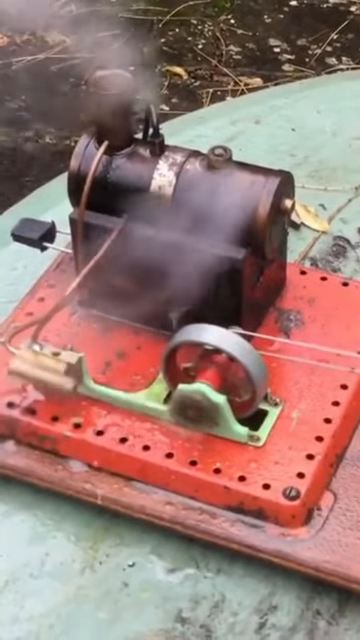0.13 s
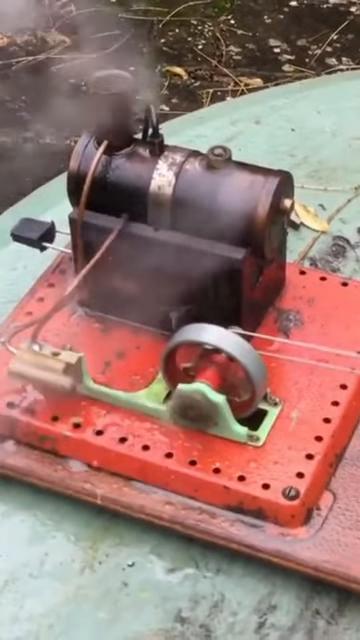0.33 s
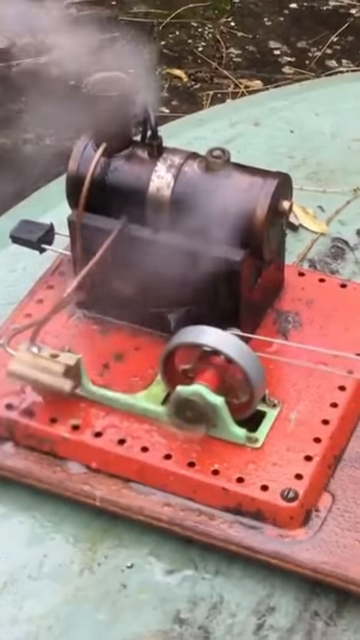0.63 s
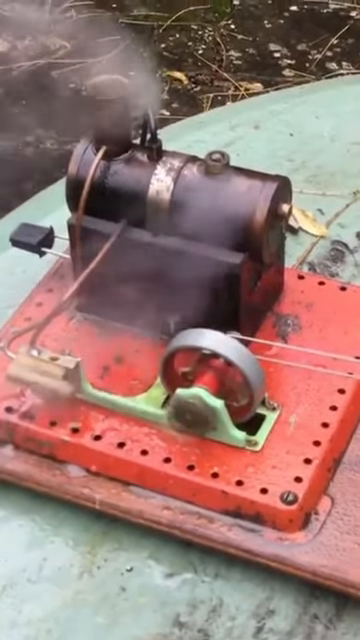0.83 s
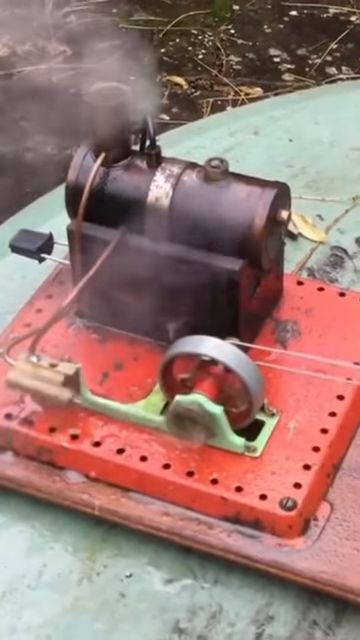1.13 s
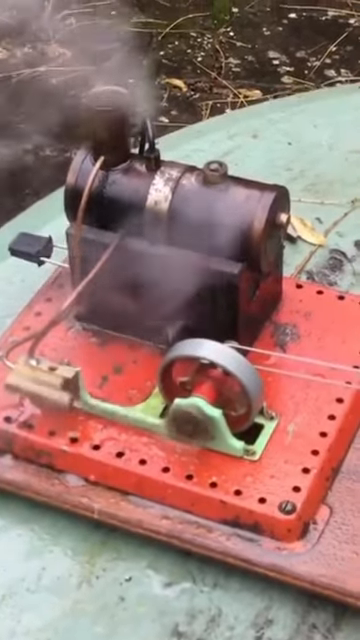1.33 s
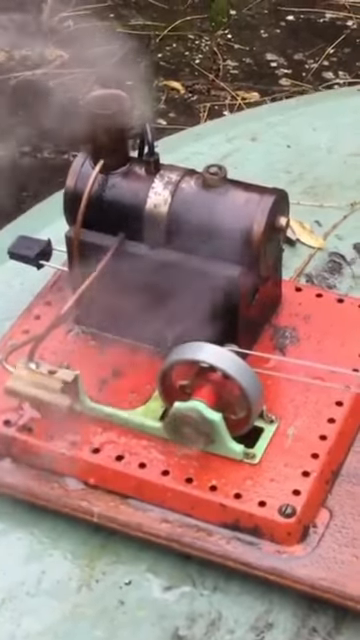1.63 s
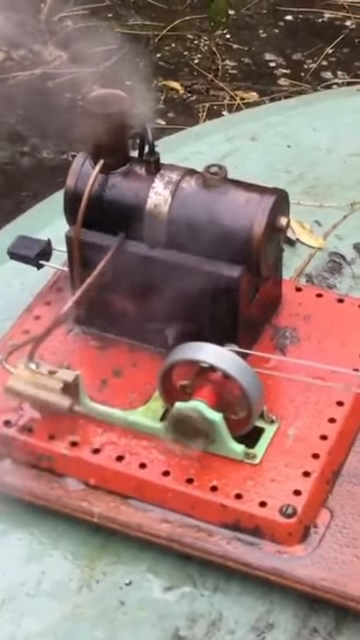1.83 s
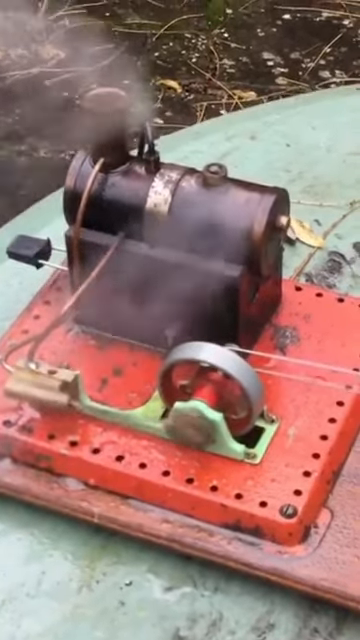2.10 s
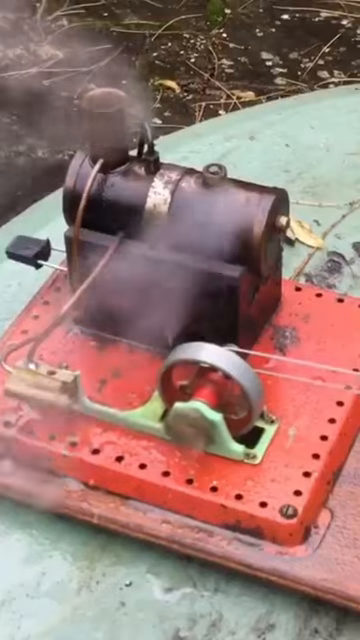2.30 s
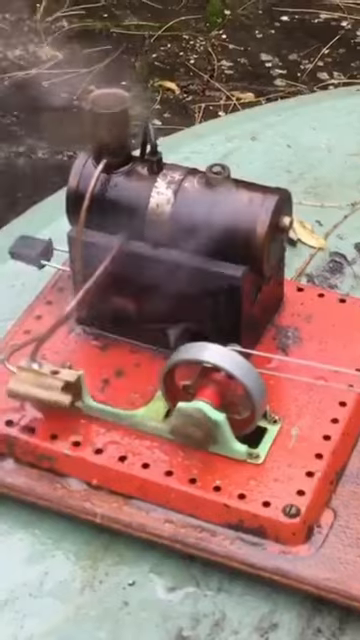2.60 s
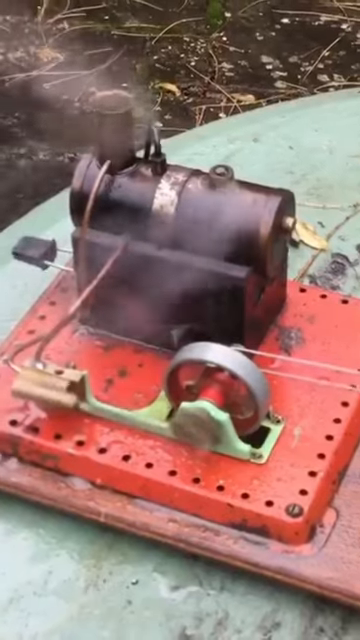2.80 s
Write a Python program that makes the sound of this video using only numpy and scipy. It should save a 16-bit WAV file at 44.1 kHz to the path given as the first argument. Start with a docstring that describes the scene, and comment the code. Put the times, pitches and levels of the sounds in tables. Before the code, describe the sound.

A small model steam engine runs fast, rattling with rapid metallic clatter over faint steam hiss

```python
"""A toy steam engine runs fast on a tin base plate on a garden table, close to the microphone.
Throughout, the garden hums faintly (coloured noise) and the unbalanced wheel shakes the table (low sines).
Each turn opens with a hard click that rings the crank; slack crank and rocking cylinder then knock in three
groups. Light parts click and chatter as table, plate, boiler, frame and bearing thud.
Early in the turn the steam hiss (coloured noise) swells; loose light parts rattle at random all the while."""
import sys
import numpy as np
from scipy import signal
from scipy.fft import rfft, irfft
from scipy.io import wavfile
from scipy.ndimage import uniform_filter1d

SR = 44100
rng = np.random.default_rng(int(sys.argv[2]) if len(sys.argv) > 2 else 0)


def pcm_store(signal):
    """Save signal as 16-bit PCM."""
    levels = np.round(np.clip(np.atleast_2d(signal), -1, 1) * 32767)
    wavfile.write(sys.argv[1], SR, levels.astype(np.int16).T)


N = 130095

TURN_S = 0.041406
# Lateness of turns against a steady beat. Each row: time in seconds, lateness in ms.
LATENESS = [(0.0, 13.29), (0.083, 13.92), (0.248, 14.67), (0.29, 14.65), (0.414, 15.01), (0.497, 15.06),
            (0.58, 14.99), (0.745, 14.37), (0.952, 14.08), (1.035, 13.72), (1.159, 13.4), (1.284, 13.42),
            (1.449, 13.19), (1.532, 12.9), (1.739, 13.01), (1.905, 12.76), (1.987, 12.78), (2.195, 13.12),
            (2.36, 13.03), (2.691, 14.39), (2.774, 14.89), (2.857, 15.59), (2.95, 15.89)]

# Garden hum spectrum. Each row: frequency in Hz, relative level in dB.
GARDEN_SPECTRUM = [(12, -55), (25, -28), (45, -7), (86, -6), (203, -1), (248, -6.5), (325, -7), (500, -24),
                   (650, -65), (1100, -120)]
GARDEN_RMS_DB = -47

# Steam hiss spectrum. Each row: frequency in Hz, relative level in dB.
STEAM_SPECTRUM = [(240, -22.5), (400, -8.5), (501, -15), (627, -7), (1090, -10.5), (1280, -8), (1480, -9.5),
                  (2060, -7), (2600, -12), (3350, -15), (4200, -12.5), (5190, -16), (6160, -34),
                  (7310, -22.5), (8570, -21.5), (9400, -36), (12200, -81.5), (20700, -120)]
STEAM_RMS_DB = -48.5  # before puffs and flicker
PUFF_SWING_DB, PUFF_PEAK_TURNS = 2.88, 0.08
FLICKER_DB_PER_DRIFT, FLICKER_RATE_HZ = 0.66, 11.44

# Shake harmonics of the wheel. Each row: multiple of the turn rate, relative level in dB.
SHAKE_HARMONICS = [(2, -16.5), (3, -14.5), (4, 1.5), (5, -23), (6, -12), (7, -2)]
# Overall shake level. Each row: time in seconds, level in dB.
SHAKE_LEVEL = [(0.0, -54), (0.42, -49), (0.53, -56), (0.64, -45.5), (0.849, -55.5), (0.93, -49),
               (1.22, -58), (1.281, -53.5), (2.0, -52.5), (2.09, -57), (2.19, -52), (2.71, -59.5),
               (2.78, -46), (2.95, -69)]
WAVER_DB_PER_DRIFT, WAVER_RATE_HZ = 4, 7

# Blow strength over time. Each row: time in seconds, table and plate in dB,
# boiler, frame and bearing in dB, rod in dB, lighter parts in dB.
FORCE = [(0, 1.2, 0.075, -1.7, -0.31), (.35, 1.9, 0.012, 0.84, -0.41), (.7, 0.86, 0.57, -0.36, 0.53),
         (1.05, 0.99, 0, 1.1, -0.24), (1.4, 1.1, -1.3, 0.62, -1.6), (1.75, 1.6, 0.49, 0.79, -1.7),
         (2.101, 1.2, -1.3, 2.5, -0.59), (2.501, 1.15, -0.036, 1.1, -1.4), (2.95, 1.8, 0.17, 0.15, 0)]

# Clicks of one turn on the light parts. Each row: time after turn start in ms (before the advance),
# rod in dB, cylinder in dB, pin in dB, small parts in dB.
CLICKS = [(-0.67, -16.5, -10.5, -10, -9.5), (0.26, -2, -4, 0.5, 0.5), (1.5, -8.5, -13.5, -4.5, -6),
          (2.5, -11, -12.5, -16.5, -13), (6.5, -24.5, -32, -24, -23), (10, -20, -20.5, -20, -21),
          (12.5, -10, -24.5, -1.5, -8), (14.5, -3, -15.5, -6, 1.5), (17, -6.5, -15.5, -6, 3.5),
          (19, -10, -9.5, -4.5, -15.5), (22.5, -20.5, -16, -16, -9.5), (26.5, -24.5, -2, -20, -16.5),
          (28.5, -21.5, -7.5, -10, -2), (30.5, -13.5, -1, -4.5, -2.5), (32, -29.5, -10, -6.5, -9.5)]
# Time advance that makes up for the top filter's delay and the chatter's rise.
# One row: rod, cylinder, pin, small parts, all in ms.
CLICK_ADVANCE_MS = (0.29, 0.28, 0.883, 1.6)
# Turn-to-turn spread. One row: rod, cylinder, pin, small parts, all in dB (std).
TURN_SCATTER_DB = (0.54, 2.2, 1.08, 2.2)
CLICK_JITTER_MS, CLICK_SCATTER_DB = 0.1, 0.95
CLICK_DB = -1
CHATTER_MS, CHATTER_RE_CLICK_DB = 2.0, -2.5
CHATTER_CARRYOVER = 0.6  # share kept from the turn before
RATTLE_PER_S, RATTLE_DB = 750, -27.5
CRANK_SCATTER_DB, CRANK_ADVANCE_MS = 3, 0.8

# Modes of the light parts. Each row: frequency in Hz, level in dB, t60 in seconds.
ROD_MODES = [(1520, -56, 0.0032), (1737, -49, 0.0084), (1904, -41, 0.0093), (2078.5, -34, 0.0085),
             (2205, -44, 0.0068), (2303, -37.5, 0.008), (2422, -47, 0.005)]
CYLINDER_MODES = [(2947, -42.5, 0.0067), (3615, -45, 0.005)]
PIN_MODES = [(4138, -44.5, 0.0027), (4296, -43, 0.0036), (4940, -43, 0.0057), (5270, -59.5, 0.0088)]
SMALL_MODES = [(7246, -58, 0.0059), (7490, -54, 0.00723), (8307, -50.5, 0.0047), (8510, -62, 0.017)]
CRANK_MODES = [(5058, -46.5, 0.011), (8400, -53.5, 0.011)]

# Thuds of one turn on the heavy parts. Each row: time after turn start in ms,
# table in dB, plate in dB, boiler in dB, frame in dB, bearing in dB.
THUDS = [(0.3, -6.9, -40.0, -10.3, -16.7, -2.3), (2.26, -17.5, -10.9, -7.9, -40.0, -25.0),
         (3.21, -40.0, -5.4, 0.0, -0.1, -4.4), (9.66, -13.5, 0.0, -18.0, -40.0, -4.9),
         (13.15, -40.0, -1.3, -14.9, -3.6, 0.0), (15.77, -8.4, -10.7, -24.3, 0.0, -20.7),
         (17.18, -8.3, -9.0, -40.0, -1.7, -4.4), (19.0, -40.0, -1.0, -12.5, -3.0, -40.0),
         (31.6, 0.0, -40.0, -23.7, -40.0, -19.2)]
THUD_JITTER_MS, THUD_SCATTER_DB, PUSH_MS = 0.034, 1, 0.4
RADIATES_FROM_HZ = 165  # heavy parts move too little air below this

# Modes of the heavy parts. Each row: frequency in Hz, level in dB, t60 in seconds.
TABLE_MODES = [(214, -37.5, 0.097)]
PLATE_MODES = [(337, -32.1, 0.079), (297, -47.7, 0.058), (363, -48.6, 0.051), (422, -57.4, 0.041)]
BOILER_MODES = [(637.5, -38, 0.036), (553, -37, 0.05)]
FRAME_MODES = [(735, -53, 0.0075), (951, -46.5, 0.028)]
BEARING_MODES = [(1298, -40.5, 0.033), (1217, -42.5, 0.014)]

MIC_LOW_CUT_HZ, MIC_TOP_HZ = 54, 9050


def undb(db):
    """dB to amplitude gain."""
    return 10 ** (np.asarray(db) / 20)


def drift(rate_hz):
    """Smooth random drift, rms about 0.73: random steps at rate_hz, averaged twice over a step."""
    step = int(SR / rate_hz)
    held = np.repeat(rng.standard_normal(N // step + 1), step)
    smooth = uniform_filter1d(uniform_filter1d(held, step), step)
    return 0.98 * smooth[:N]


def coloured_noise(spectrum, rms_db):
    """Gaussian noise shaped by a spectrum, interpolated over log frequency, at a set rms."""
    hz = np.maximum(np.fft.rfftfreq(N, 1 / SR), 1)
    points = np.array(spectrum)
    gain = undb(np.interp(np.log(hz), np.log(points[:, 0]), points[:, 1]))
    noise = irfft(rfft(rng.standard_normal(N)) * gain, N)
    return noise * undb(rms_db) / np.std(noise)


def ring(strikes, modes, swell):
    """Decaying modes; light parts are reached through the linkage, so their ring swells first."""
    out = 0
    for hz, db, t60_s in modes:
        pole = np.exp(2j * np.pi * hz / SR - np.log(1000) / (t60_s * SR))
        mode = signal.lfilter([1], [1, -pole], strikes)
        if swell:  # second pass, scaled to keep the peak level
            mode = signal.lfilter([np.e * (1 - abs(pole))], [1, -pole], mode)
        out = out + undb(db) * mode.imag
    return out


def place(at_s, shapes):
    """Sum one short shape at each time; the result starts 0.5 s early so rings can build."""
    index = np.round(at_s * SR).astype(int)[:, None] + np.arange(shapes.shape[1]) + SR
    return np.bincount(index.ravel(), shapes.ravel(), N + 2 * SR)[SR // 2:N + SR]


def hump(length_ms):
    """One smooth contact: sine-squared pulse."""
    ms = np.arange(192) / SR * 1000
    return np.sin(np.pi * np.clip(ms / length_ms, 0, 1)) ** 2


def force_db(at_s, column):
    """Blow strength at the given times."""
    rows = np.array(FORCE)
    return np.interp(at_s, rows[:, 0], rows[:, column])


def garden():
    """Faint hum: steady coloured noise."""
    return coloured_noise(GARDEN_SPECTRUM, GARDEN_RMS_DB)


def steam(turns):
    """Hiss from boiler and cylinder ports, swelling once a turn and flickering."""
    puff_db = PUFF_SWING_DB * np.cos(2 * np.pi * (turns - PUFF_PEAK_TURNS))
    flicker_db = FLICKER_DB_PER_DRIFT * drift(FLICKER_RATE_HZ)
    return coloured_noise(STEAM_SPECTRUM, STEAM_RMS_DB) * undb(puff_db + flicker_db)


def shake(turns):
    """Unbalanced wheel shakes the table: wavering sines on multiples of the turn rate."""
    out = 0
    for multiple, db in SHAKE_HARMONICS:
        gain = undb(db + WAVER_DB_PER_DRIFT * drift(WAVER_RATE_HZ))
        out = out + gain * np.sqrt(2) * np.sin(2 * np.pi * multiple * turns)
    times_s, level_db = np.array(SHAKE_LEVEL).T
    return undb(np.interp(np.arange(N) / SR, times_s, level_db)) * out


def crank(starts_s):
    """The hard first click of each turn rings the crank."""
    gain = undb(CRANK_SCATTER_DB * rng.standard_normal((len(starts_s), 1)))
    return ring(place(starts_s - CRANK_ADVANCE_MS / 1000, gain), CRANK_MODES, True)[SR // 2:]


def click_shapes(turn_count, click_count):
    """Impulse plus a short noise burst of chatter, partly alike from turn to turn."""
    window = hump(CHATTER_MS)
    chatter = rng.standard_normal((turn_count, click_count, len(window)))
    chatter = signal.lfilter([1], [1, -CHATTER_CARRYOVER], chatter, axis=0)
    chatter = chatter.reshape(turn_count * click_count, -1) * window
    chatter = chatter / np.linalg.norm(chatter, axis=1, keepdims=True)
    impulse = signal.unit_impulse(len(window))
    return undb(CLICK_DB) * (undb(CHATTER_RE_CLICK_DB) * chatter + impulse)


def loose_rattle():
    """Random impulses of exponentially distributed height from looseness in the light parts."""
    hit, height = rng.random(size=(N + SR // 2, 2)).T
    return undb(RATTLE_DB) * (hit < RATTLE_PER_S / SR) * np.log(1 - height)


def clicks(starts_s):
    """Clicks with chatter, and loose rattle, ring the light parts; some turns hit harder."""
    rows = np.array(CLICKS)
    chance = rng.standard_normal((len(starts_s), len(rows), 5))
    turn_db = np.array(TURN_SCATTER_DB) * rng.standard_normal((len(starts_s), 1, 4))
    at_s = (starts_s[:, None] + (rows[:, 0] + CLICK_JITTER_MS * chance[..., 0]) / 1000).ravel()
    level_db = rows[:, 1:] + CLICK_SCATTER_DB * chance[..., 1:] + turn_db
    shapes = click_shapes(len(starts_s), len(rows))
    rattle = loose_rattle()
    out = 0
    for part, modes in enumerate((ROD_MODES, CYLINDER_MODES, PIN_MODES, SMALL_MODES)):
        gain = undb(level_db[..., part].ravel() + force_db(at_s, column=3 if part == 0 else 4))
        strikes = place(at_s - CLICK_ADVANCE_MS[part] / 1000, gain[:, None] * shapes)
        out = out + ring(strikes + rattle, modes, True)[SR // 2:]
    return out


def thuds(starts_s):
    """Soft pushes, nearly alike on every turn, ring the heavy parts."""
    rows = np.array(THUDS)
    chance = rng.standard_normal((len(starts_s), len(rows), 6))
    at_s = (starts_s[:, None] + (rows[:, 0] + THUD_JITTER_MS * chance[..., 0]) / 1000).ravel()
    level_db = rows[:, 1:] + THUD_SCATTER_DB * chance[..., 1:]
    push = hump(PUSH_MS) / hump(PUSH_MS).sum()
    out = 0
    for part, modes in enumerate((TABLE_MODES, PLATE_MODES, BOILER_MODES, FRAME_MODES, BEARING_MODES)):
        gain = undb(level_db[..., part].ravel() + force_db(at_s, column=1 if part < 2 else 2))
        out = out + ring(place(at_s, gain[:, None] * push), modes, False)
    radiation = signal.butter(2, RADIATES_FROM_HZ, "high", fs=SR, output="sos")
    return signal.sosfiltfilt(radiation, out)[SR // 2:]


def scene():
    """Garden, steam and engine on one uneven turn clock."""
    count = np.arange(-4, int(N / SR / TURN_S) + 2)
    times_s, late_ms = np.array(LATENESS).T
    beat_s = count * TURN_S
    starts_s = beat_s + np.interp(beat_s, times_s, late_ms) / 1000
    turns = np.interp(np.arange(N) / SR, starts_s, count)
    background = garden() + steam(turns) + shake(turns)
    engine = crank(starts_s) + clicks(starts_s) + thuds(starts_s)
    return (background + engine)[None]


def record(dry):
    """The microphone drops the deep bass and cuts the top."""
    low_cut = signal.butter(2, MIC_LOW_CUT_HZ, "high", fs=SR, output="sos")
    top_cut = signal.ellip(10, 0.2, 80, MIC_TOP_HZ, fs=SR, output="sos")
    return signal.sosfilt(top_cut, signal.sosfilt(low_cut, dry))


dry = scene()
out = record(dry)
pcm_store(out)
```